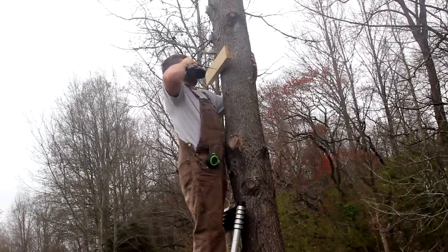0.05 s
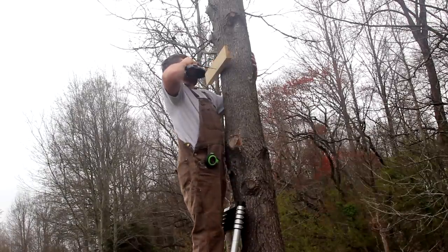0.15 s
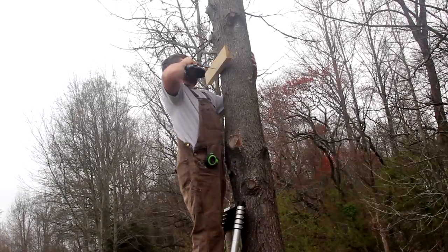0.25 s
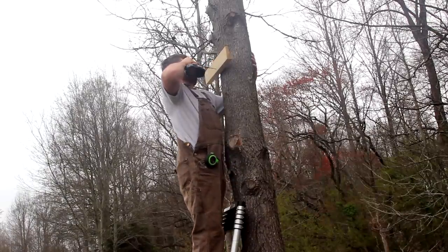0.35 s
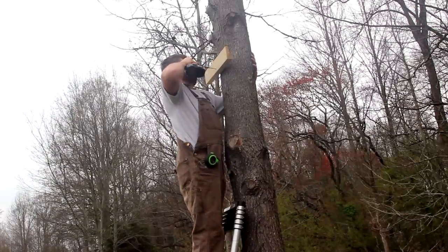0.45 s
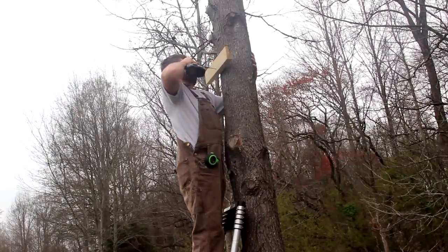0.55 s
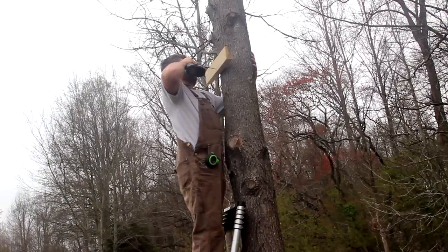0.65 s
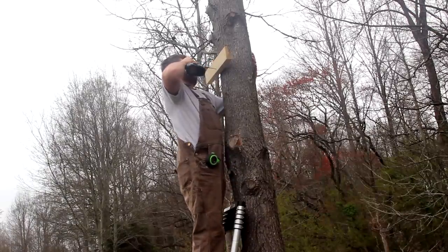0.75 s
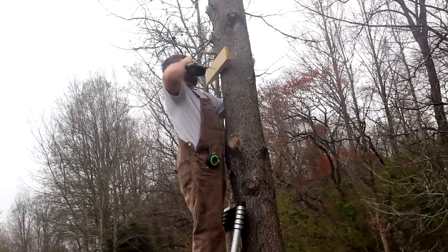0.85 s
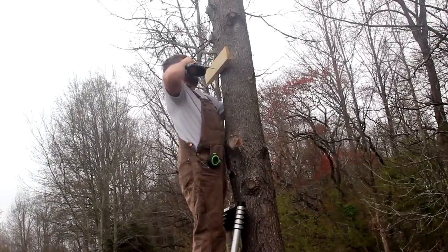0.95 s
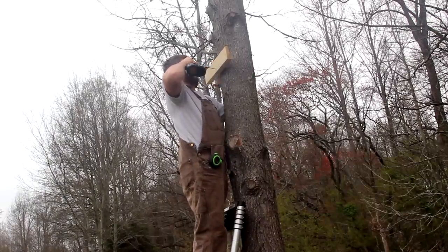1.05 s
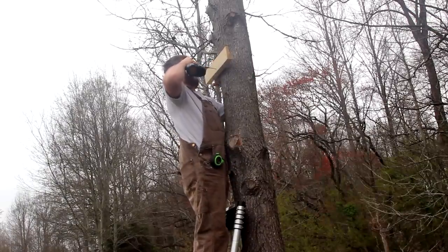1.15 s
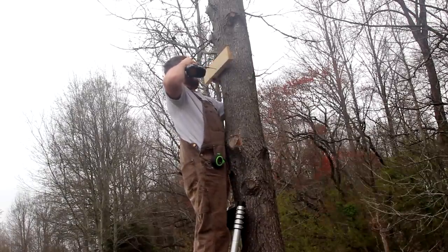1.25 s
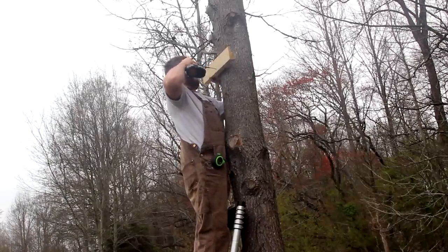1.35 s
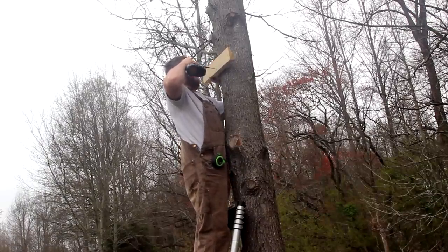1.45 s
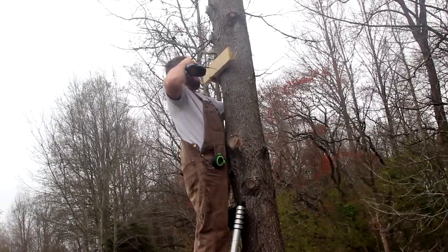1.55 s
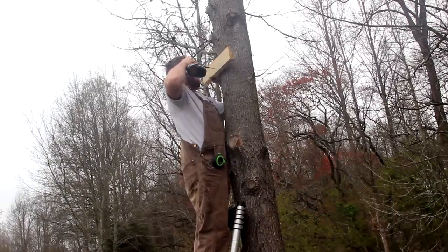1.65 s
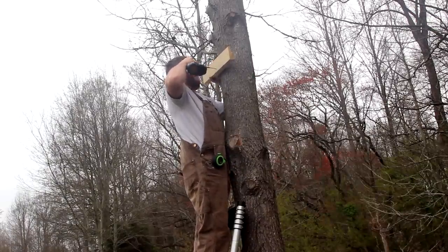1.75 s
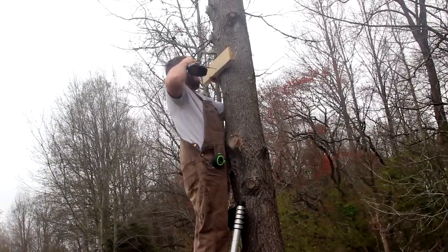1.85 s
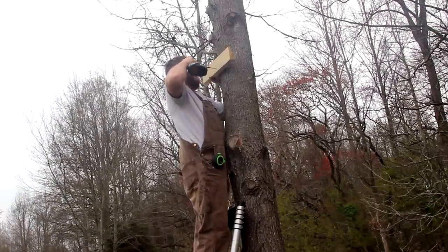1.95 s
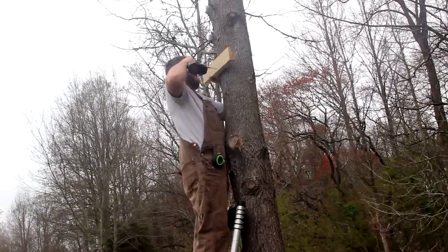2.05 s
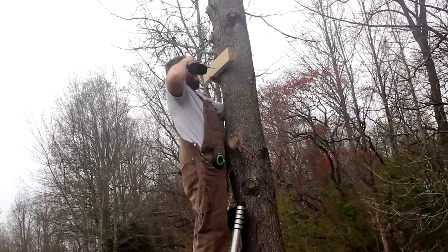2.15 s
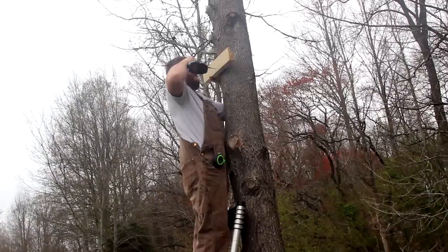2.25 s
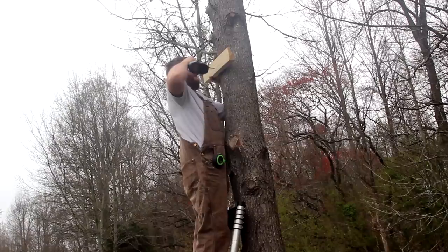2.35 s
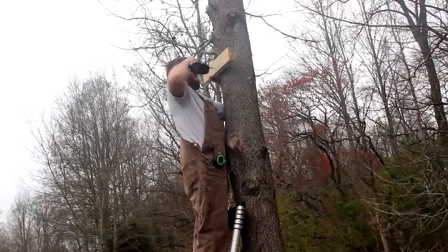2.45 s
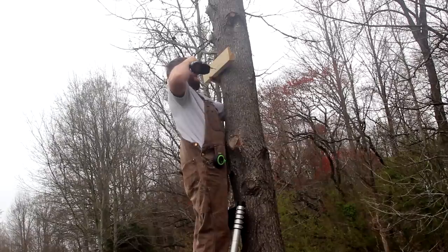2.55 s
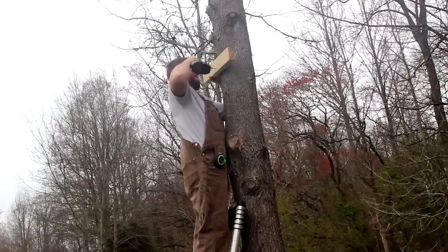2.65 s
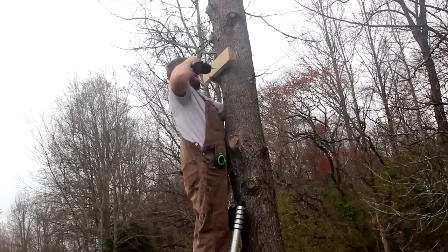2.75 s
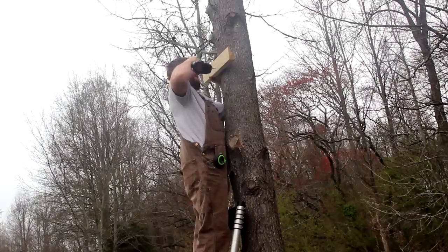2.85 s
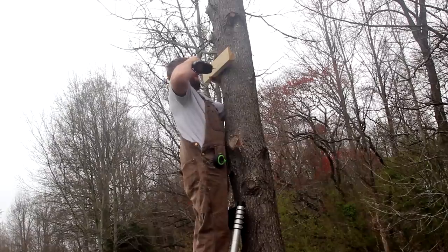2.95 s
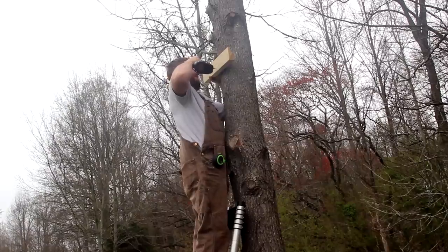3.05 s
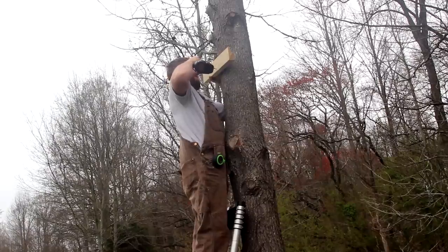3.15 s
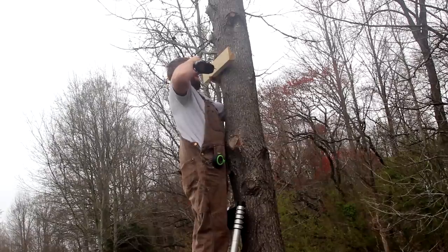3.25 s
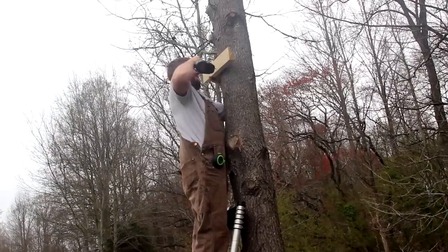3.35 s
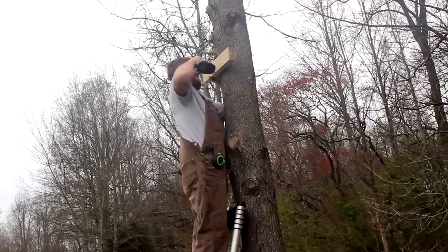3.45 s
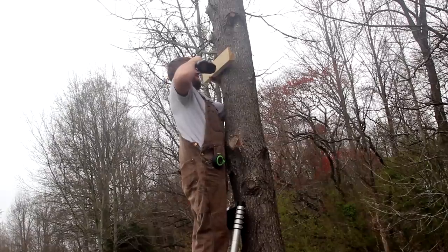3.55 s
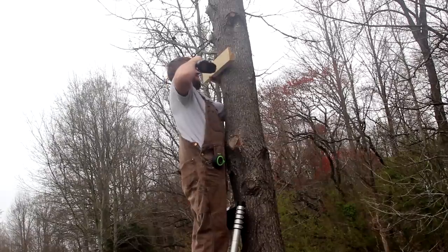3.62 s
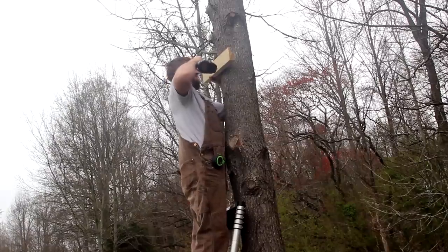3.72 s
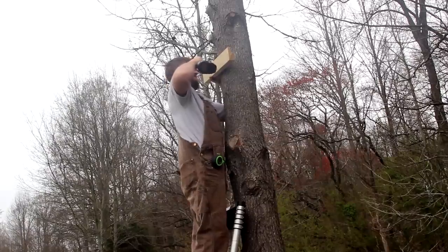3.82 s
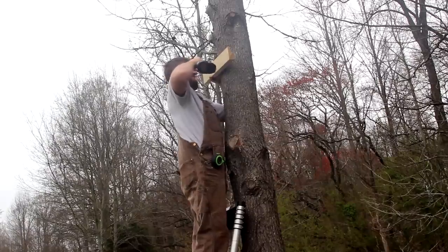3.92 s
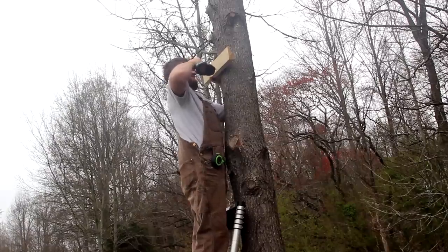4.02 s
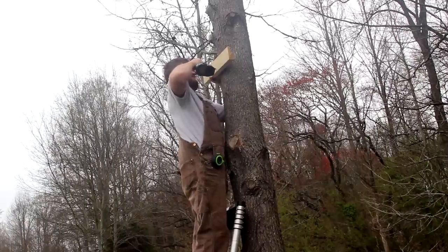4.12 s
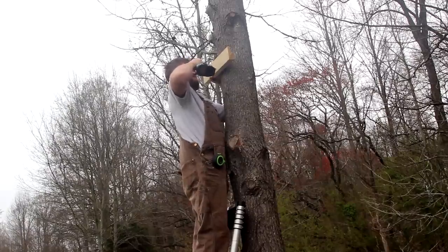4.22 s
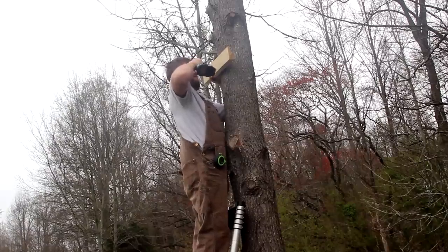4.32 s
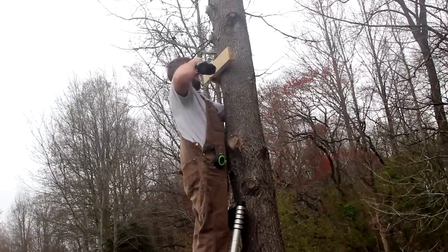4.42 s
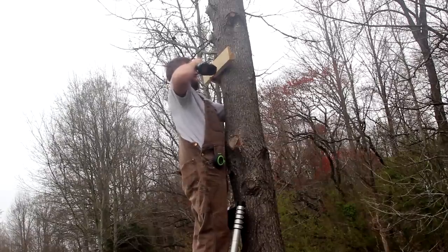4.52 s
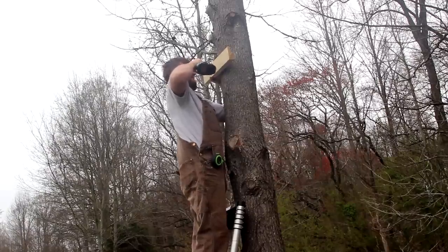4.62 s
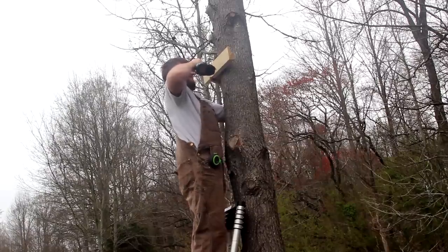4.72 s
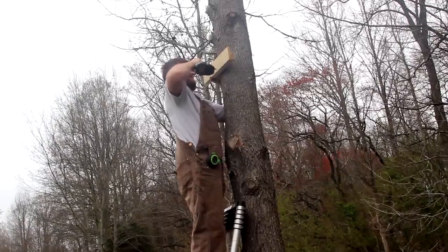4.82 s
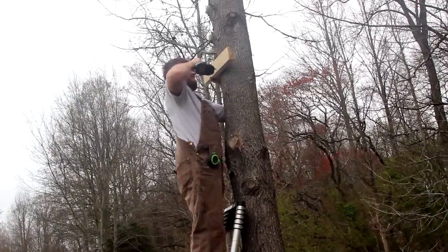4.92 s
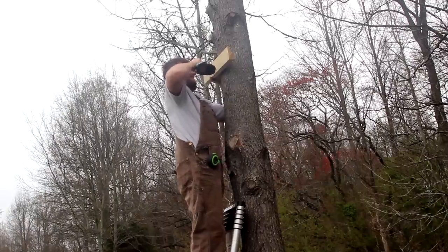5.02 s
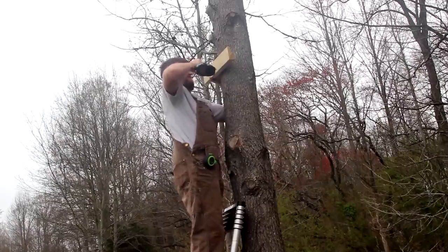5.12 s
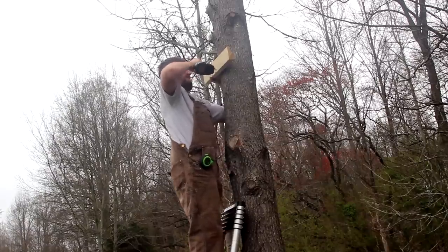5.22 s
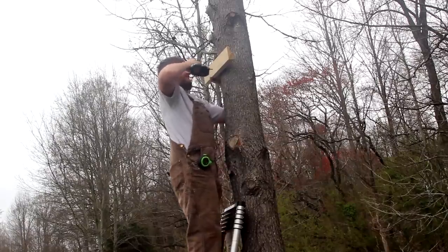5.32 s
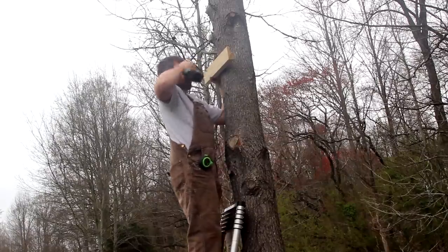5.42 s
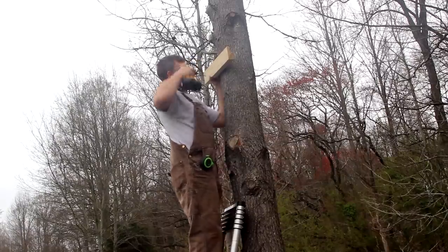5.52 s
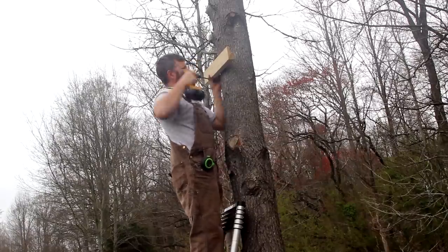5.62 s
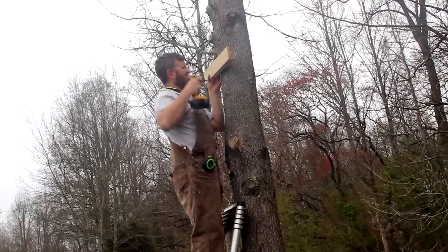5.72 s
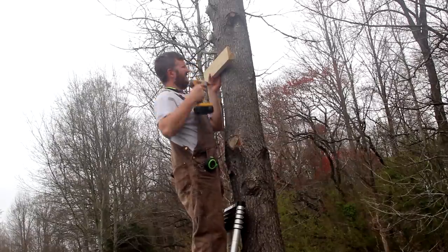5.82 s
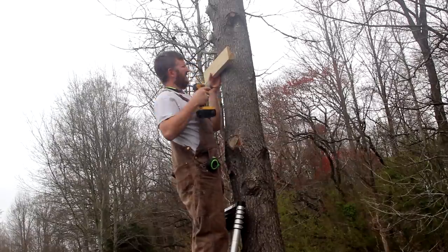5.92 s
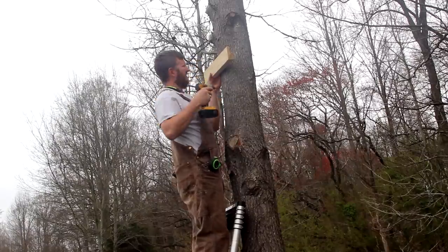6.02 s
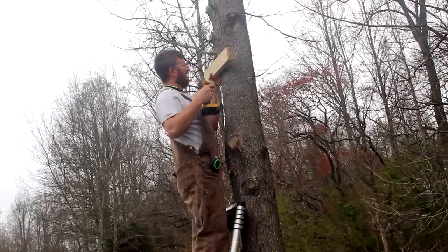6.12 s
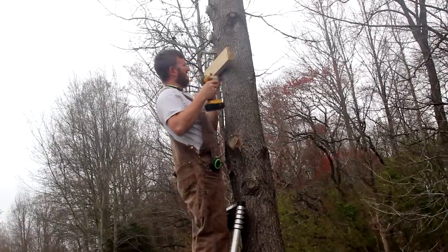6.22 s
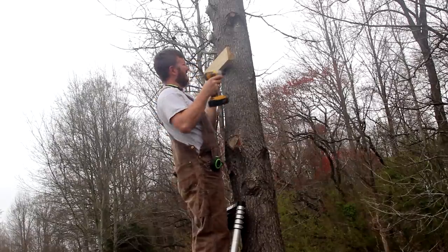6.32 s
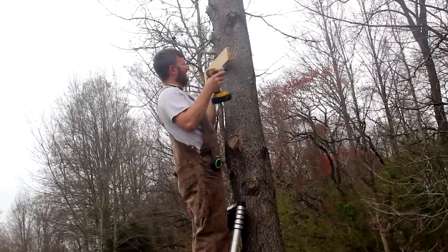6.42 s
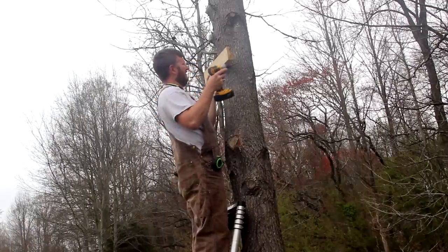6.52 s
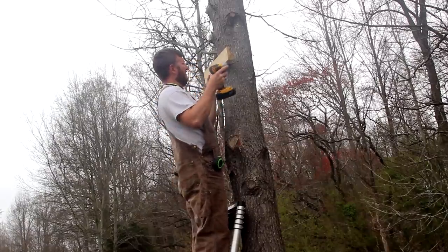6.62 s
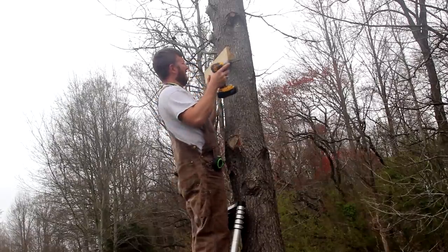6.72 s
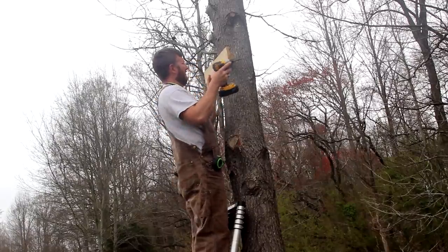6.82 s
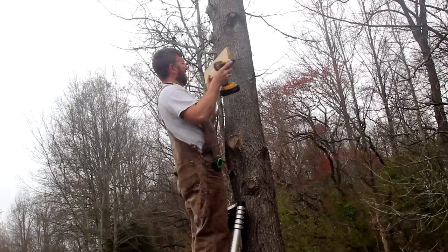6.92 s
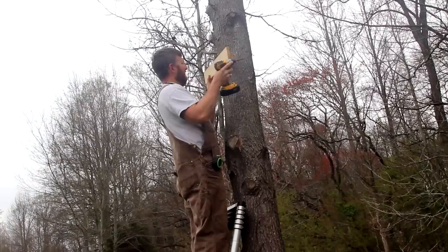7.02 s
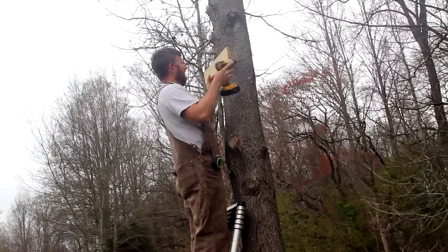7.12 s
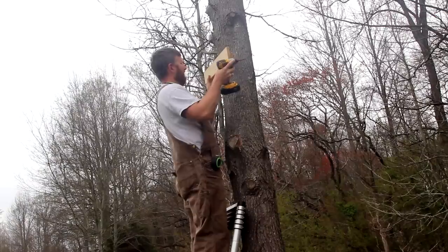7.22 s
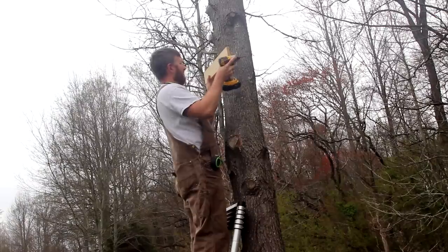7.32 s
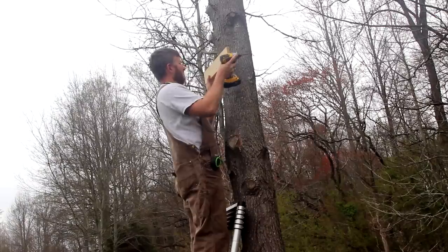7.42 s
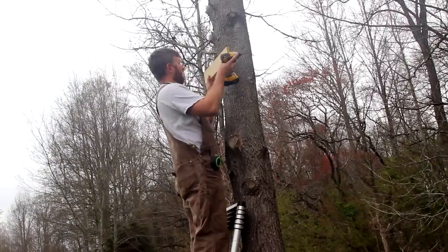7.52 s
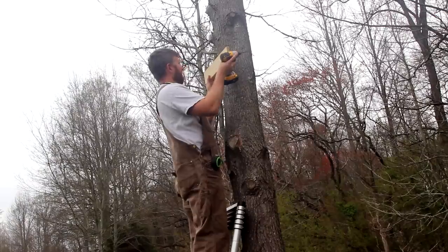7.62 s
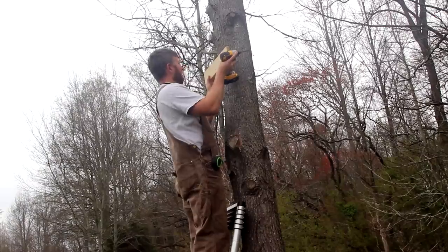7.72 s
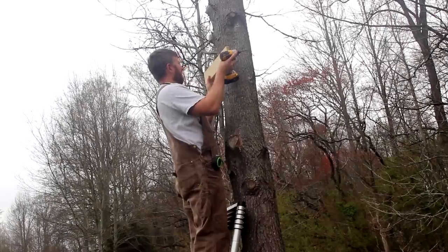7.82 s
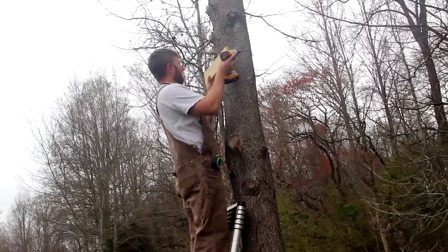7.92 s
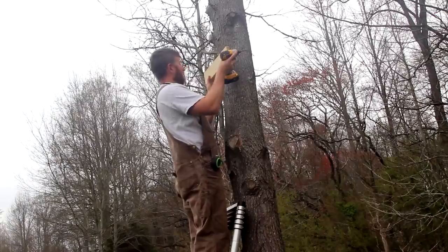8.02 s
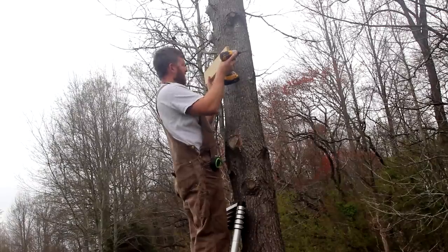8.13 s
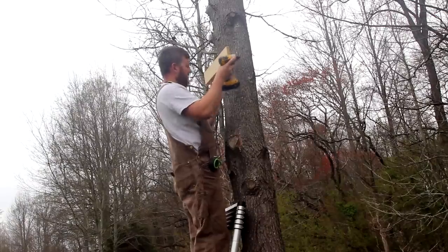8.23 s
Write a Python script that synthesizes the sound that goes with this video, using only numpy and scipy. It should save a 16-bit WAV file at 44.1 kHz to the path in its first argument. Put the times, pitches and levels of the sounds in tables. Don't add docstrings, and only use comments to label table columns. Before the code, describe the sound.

In thin open woods with faint traffic wash, small plastic ticks and a thin metallic squeak come first. An impact driver then fires a short burst, followed by a long, loud drive of rapid cracking, ringing blows on a wooden board. Two more short bursts follow, with trunk echoes. Afterwards, faint bird whistles and soft camera ticks remain. The tool is some metres from the microphone, whose gain dips under the noise.

```python
import sys
import numpy as np
from scipy import signal
from scipy.io import wavfile
from scipy.ndimage import uniform_filter1d

SR = 44100
rng = np.random.default_rng(int(sys.argv[2]) if len(sys.argv) > 2 else 0)


def gain_from_db(level_db):
    decades = np.asarray(level_db, float) / 20
    return 10 ** decades


def dump(signal):
    limited = np.clip(np.atleast_2d(signal).T, -1, 1)
    pcm = np.round(limited * 32767).astype(np.int16)
    wavfile.write(sys.argv[1], SR, pcm)


N = 364707

# [f/Hz, level/dB, t60/s]
LOW_RING = [(1208, 3, 0.051), (1349, -3.5, 0.045), (794, -6.5, .05), (571, -9, 0.034)]
HIGH_RING = [(1893, -3.5, 0.051), (1778, -10, 0.08), (1596, -1.5, 0.02)]
BODY_RING = [(3057, 0.5, 0.016), (3580, -6, 0.023), (4547, -8.5, 0.026), (6320, -13.5, 0.022),
             (8140, -4, 0.0056)]
# [f/Hz, level/dB]
GEAR_HISS = [(150, -56), (500, -10.5), (1500, 7), (4000, 2), (8000, -1.5), (12000, -22.5), (16000, -17)]
# [start/s, hammer engages/s, release/s]
PULLS = [
    (1.72, 1.755, 1.94),
    (2.1, 2.17, 3.915),
    (4.385, 4.45, 4.71),
    (5.015, 5.035, 5.215),
]
COAST_S = .06
PLAIN_DB = -14


def evened(x):
    return x / np.sqrt(np.mean(x ** 2) + 1e-20)


def read(points, hz):
    f, value = np.transpose(points)
    return np.interp(np.log(hz + 1), np.log(f + 1), value)


def curve(points, t):
    return np.interp(t, *np.transpose(points))


def add(mix, s, sound):
    part = mix[round(s * SR):][:len(sound)]
    part += sound[:len(part)]


def sine(hz):
    return np.sqrt(2) * np.sin(2 * np.pi * np.cumsum(hz) / SR)


def colour(x, points):
    half = np.maximum(read(points, np.fft.rfftfreq(4096, 1 / SR)), -100) * np.log(10) / 20
    log_gain = np.concatenate([half, half[-2:0:-1]])
    taps = np.fft.ifft(np.exp(np.conj(signal.hilbert(log_gain)))).real[:2048]
    return signal.oaconvolve(x, taps / np.linalg.norm(taps))[:len(x)]


def resonate(x, hz, width_hz):
    pole = np.exp((2j * np.pi * hz - np.pi * width_hz) / SR)
    return 2 * signal.lfilter([1 - abs(pole)], [1, -pole], x).real


def resonate_twice(x, hz, width_hz):
    return evened(resonate(resonate(x, hz, width_hz), hz, width_hz))


def ring(modes, luck, spread_db=6.0, detune=0.026):
    hz, db, t60_s = np.transpose(modes)[:, :, None]
    t = np.arange(4000) / SR
    size, pitch, phase = luck[:, :len(modes), None] * np.minimum(hz / 1200, 1) ** 2
    swing = gain_from_db(db + spread_db * np.clip(size, -1, 1) - 60 * t / t60_s) * (1 - np.exp(-t / .0006))
    return (swing * np.sin(2 * np.pi * hz * (1 + detune * pitch) * t + 0.66 * phase)).sum(0)


def woods():
    # [f/Hz, level/dB]
    wash_spectrum = [(19, -43), (32, -3), (48, 1), (102, 3.0), (194, -5), (477, 0.0), (1090, -8.0),
                     (1370, -8), (1560, -11.5), (2480, -14.0), (5500, -20),
                     (15000, -30)][:-1] + [(15780, -25.5), (15800, -92)]
    # [f/Hz, width/Hz, level/dB]
    hums = [(104.7, 11.3, -63.5), (251, 12.4, -66.5)]
    # [t/s, level/dB]
    engine_swell = [
        (0, -8),
        (.5, -4.5),
        (1.2, 3.5),
        (5.4, -3.5),
        (5.599, 9),
        (6.6, 1.5),
        (8.27, 3),
    ]
    wash_db, whine_hz, whine_db = -49, 15645.4, -71
    t, hz = np.arange(N) / SR, np.fft.rfftfreq(1024, 1 / SR)
    a, b, patches = rng.standard_normal((N // 256 + 5, 513, 3)).T
    patches = evened(uniform_filter1d(uniform_filter1d(patches, 12, 0), 14, 1))
    z = (a + 1j * b) * gain_from_db(read(wash_spectrum, hz)[:, None] + 1.43 * patches)
    wash = gain_from_db(wash_db - 2.0) * evened(signal.istft(z, nperseg=1024, noverlap=768)[1][:N])
    whine = gain_from_db(whine_db) * np.sqrt(2) * np.sin(2 * np.pi * whine_hz * t)
    noise = rng.standard_normal(N)
    engines = sum(gain_from_db(db) * resonate_twice(noise, f, width_hz) for f, width_hz, db in hums)
    return wash + whine + gain_from_db(curve(engine_swell, t)) * engines


def focus_creep():
    low, high = rng.standard_normal((N, 2)).T * (rng.random(N) < 150 / SR)
    return gain_from_db(-66) * evened(resonate(low, 1340, 70)) + gain_from_db(-67) * evened(resonate(high, 2480, 150))


def focus_ticks():
    # [t/s, peak level/dB]
    tick_events = [(0.2475, -38), (0.376, -46), (0.4983, -41), (0.612, -40), (0.7482, -49), (0.816, -46),
                   (0.8844, -40), (1.005, -46), (1.484, -40), (1.517, -42), (1.6057, -38), (1.6422, -36),
                   (1.6866, -35.5), (1.7265, -40), (5.6173, -38.5), (6.1671, -39), (6.3636, -49),
                   (6.3841, -40.5), (6.5132, -38), (6.637, -38), (6.6845, -38.5), (6.7592, -38),
                   (7.0885, -45), (7.103, -40), (7.1509, -40), (7.1838, -38.5), (7.6911, -38.5),
                   (7.887, -44), (8.0573, -52), (8.1201, -40)]
    # [f/Hz, level/dB, t60/s]
    case_ring = [(1974, 2, 0.028), (2170, -0.5, 0.022), (2470, -3, 0.042), (1370, -5.5, 0.051)]
    second_tick_db = -9
    out = np.zeros(N)
    for (s, db), luck in zip(tick_events, rng.standard_normal((len(tick_events), 3, 4))):
        add(out, s, gain_from_db(db - 2.5) * ring(case_ring, luck, spread_db=1.5))
        if s < 1:
            second_s = s + 0.012 + .004 * luck[0, 0]
            second_amp = gain_from_db(db + second_tick_db + 2 * luck[1, 0])
            add(out, second_s, second_amp * ring(case_ring, luck[::-1]))
    return out


def squeaks():
    # [t/s, pitch/Hz, level/dB]
    squeak_tracks = [
        [(.316, 4900, -60), (.348, 6200, -54), (.365, 5720, -52), (.39, 6000, -55), (.415, 5720, -50),
         (.445, 5920, -49), (.71, 5985, -55), (.752, 5720, -54)],
        [(.755, 6000, -64), (.78, 6150, -59), (.81, 6150, -58), (.82, 5500, -60)],
        [(1.485, 4900, -62), (1.5, 5300, -58), (1.52, 4900, -60)],
        [(1.53, 3900, -60), (1.55, 4800, -56), (1.575, 5330, -53), (1.598, 4900, -57), (1.625, 3700, -62)],
    ]
    out = np.zeros(N)
    for rows in squeak_tracks:
        s, hz_points, db_points = np.transpose(rows)
        t = np.arange(s[0], s[-1], 1 / SR)
        glide_hz = uniform_filter1d(np.interp(t, s, hz_points), 500, mode="nearest")
        waver = evened(uniform_filter1d(rng.standard_normal(len(t)), 150))
        turn = 2 * np.pi * np.cumsum(glide_hz + (25 + 40 * (t > 1)) * waver) / SR
        tone = np.sin(turn) + gain_from_db(glide_hz / 100 - 63 - 15 * (t < 1)) * np.sin(2 * turn)
        fade = signal.windows.tukey(len(t), 0.0067 / (t[-1] - t[0]))
        add(out, t[0], np.sqrt(2) * gain_from_db(np.interp(t, s, db_points)) * tone * fade)
    return out


def bit_clicks():
    # [t/s, peak level/dB]
    click_events = [
        (0.3227, -38.5),
        (0.376, -29.5),
        (1.474, -38),
        (1.4867, -38),
        (1.5208, -35.5),
        (1.531, -34),
        (1.619, -35),
        (1.6616, -32),
        (6.439, -46),
    ]
    out, t = np.zeros(N), np.arange(1500) / SR
    for s, db in click_events:
        hiss = colour(rng.standard_normal(len(t)), GEAR_HISS)
        add(out, s, gain_from_db(db - 7 - 60 * t / 0.039) * hiss)
    return out


def bit_scrapes():
    # [t/s, length/s, level/dB, f/Hz]
    scrape_events = [
        (0.811, 0.076, -50, 7460),
        (1.468, 0.37, -54.5, 1990),
        (8.227, .03, -56, 7500),
    ]
    out = np.zeros(N)
    for s, length_s, db, hz in scrape_events:
        grit = rng.standard_normal(round(length_s * SR)) ** 3
        add(out, s, gain_from_db(db) * evened(resonate(grit, hz, .6 * hz)) * np.hanning(len(grit)))
    return out


def rattle_level():
    pull_db = [-31, -28.5, -31, -32]
    idle_db, surge_db, surge_s = -11, 5, .04
    load_db_per_s, brake_db_per_s = -1.5, -400
    level = np.zeros(N)
    for (start, engage, stop), db in zip(PULLS, pull_db):
        t = np.arange(start, stop + COAST_S, 1 / SR)
        shape_db = db + load_db_per_s * (t - start)
        shape_db += idle_db * np.clip((engage - t) / 0.017, 0, 1)
        shape_db += surge_db * np.exp(-((t - engage - .03) / surge_s) ** 2)
        shape_db += brake_db_per_s * np.maximum(t - stop, 0)
        add(level, start, gain_from_db(shape_db) * np.minimum((t - start) / 0.0052, 1))
    return level


def gears():
    # [f/Hz, width/Hz, level/dB]
    mesh_modes = [(4560, 520, -11), (8600, 800, -18)]
    # [t/s, level/dB]
    mesh_fade = [
        (2.2, -15.5),
        (2.5, 0),
        (2.8, -13),
        (3.1, -17),
    ]
    knocks = rng.standard_normal(N) * gain_from_db(2.2 * np.minimum(rng.exponential(1, N), 4))
    knocks *= rng.random(N) < 9000 / SR
    shaken = sum(gain_from_db(db) * evened(resonate(knocks, hz, 4 / t60_s))
                 for hz, db, t60_s in [*LOW_RING, *HIGH_RING, *BODY_RING])
    mesh = sum(gain_from_db(db) * resonate_twice(knocks, hz, width_hz) for hz, width_hz, db in mesh_modes)
    mesh = gain_from_db(curve(mesh_fade, np.arange(N) / SR)) * mesh
    hiss = evened(colour(knocks, GEAR_HISS))
    return rattle_level() * (mesh + gain_from_db(-7.5) * evened(shaken) + gain_from_db(-12.0) * hiss)


def blows():
    # [t/s, blows so far]
    beat = [
        (2.1849, 0),
        (2.3987, 7),
        (2.7036, 17),
        (2.973, 26),
        (3.2429, 35),
        (3.4938, 44),
        (3.6269, 49),
        (3.7321, 53),
        (3.857, 58),
        (3.9112, 60),
    ]
    # [t/s, crack level/dB, extra board ring/dB]
    hard_blows = [(2.1846, -6.5, 8.5), (2.216, -8.5, 2), (2.2462, -10.5, 6.5), (2.276, -9.5, 2.5),
                  (2.399, -13, 3), (2.46, -9.5, 3), (2.4897, -12.5, 8.5), (2.5202, -10, 3),
                  (2.5512, -10, 4), (2.5811, -6.5, 3), (2.6121, -10.5, 6.5), (2.7631, -9, 2),
                  (2.854, -14, 6), (2.9428, -7.5, 0), (3.1237, -13, 0), (3.153, -9.5, -1),
                  (3.1834, -9.5, 4), (3.2989, -10, 4.5), (3.3543, -12, 4), (3.4091, -9, 3),
                  (3.4937, -11, 0), (3.521, -10.5, 0), (3.5474, -12, -16), (3.6542, -12.5, -10),
                  (3.6805, -13.5, 2), (3.7061, -10, -2), (3.7319, -12, -1), (3.783, -11, 5),
                  (3.8327, -10, -0.5), (3.8828, -10.5, 2)]
    # [t/s, crack level/dB, extra board ring/dB]
    burst_blows = [(1.7486, -23.5, 2), (1.7948, -3.5, 5), (1.8251, -6, -4), (1.8558, -12, -1),
                   (1.8872, -11, -4), (1.9239, -14.5, -9), (1.9469, -18, 8), (4.4786, -2.5, 0),
                   (4.5156, -10.5, 1), (4.543, -9.5, 1), (4.5708, -11.5, -2.5), (4.5963, -11.5, 1),
                   (4.6234, -12, 1), (4.6489, -16.5, 3), (4.6751, -13.5, -5), (4.7039, -17, -3),
                   (5.0387, -4.5, -3), (5.0715, -6.5, -0.5), (5.0973, -6.5, -10), (5.1227, -11, -17),
                   (5.147, -20, -9), (5.1707, -11, 2), (5.2, -13.5, -5)]
    plain_spread_db = -0.4
    s, number = np.transpose(beat)
    plain_s = np.interp(np.arange(number[-1] + 1), number, s)
    plain_db = PLAIN_DB + plain_spread_db * rng.standard_normal(len(plain_s))
    drive = np.transpose([plain_s, plain_db, 0 * plain_s])
    for row in hard_blows:
        drive[np.argmin(abs(plain_s - row[0]))] = row
    return np.array(sorted(map(tuple, [*burst_blows, *drive]))).T


def blow_rings(s, db, extra_db):
    free_db = [-29.5, -24.5, -29]
    tight_db = [-5, -2.5, 6.5]
    fresh_db = [4.5, -3.5, 9]
    board_share = [0.52, 1, 0]
    slack_gap_s, tight_gap_s, settle_s = 0.032, 0.026, 0.057
    ring_follows, ring_spread_db = 0.85, 2
    gap_s = np.minimum(np.diff(s, prepend=0), np.diff(s, append=9))
    tight = np.clip((slack_gap_s - gap_s) / (slack_gap_s - tight_gap_s), 0, 1)
    fresh = sum(np.exp(-abs(s - engage) / settle_s) * (s > start) * (s < stop + COAST_S)
                for start, engage, stop in PULLS)
    ring_db = free_db + np.outer(tight, tight_db) + np.outer(fresh, fresh_db)
    ring_db = ring_db + ring_follows * (db - PLAIN_DB)[:, None] + np.outer(extra_db, board_share)
    ring_db = ring_db + ring_spread_db * rng.uniform(-1.2, 1.2, ring_db.shape)
    return ring_db - db[:, None]


def light_strikes(s):
    # [t/s, level/dB]
    slips = [(1.7776, -14), (1.787, -12), (1.813, -14.5), (1.8354, -13), (1.8732, -17), (1.8831, -9),
             (1.8971, -18), (1.9128, -15), (1.9345, -21), (1.963, -19), (1.9692, -22), (2.1187, -33),
             (2.139, -28), (2.152, -30), (2.1626, -15.5), (2.1752, -12.5), (2.1994, -25), (2.2077, -21),
             (3.1008, -18), (3.9251, -24.5), (4.4057, -30.5), (4.4502, -22), (4.4719, -15.5),
             (4.4944, -30.5), (4.9909, -28), (5.0294, -14), (5.0333, -13.5), (5.049, -22.5), (5.061, -6),
             (5.2142, -20.5)]
    # [from/s, to/s, lag/s, level/dB]
    bounces = [
        (2.3, 2.95, .009, -29.5),
        (2.3, 2.95, .02, -25),
        (4.5, 4.71, -.0068, -15.5),
        (5.06, 5.21, -0.01, -28),
    ]
    rebound_db = [-1, 1, 4]
    seated_db = [-7, -3, -2]
    seated_s, bounce_spread_db, bounce_jitter_s = 3, 1, .001
    light = list(slips)
    for t0, t1, lag_s, bounce_db in bounces:
        when, size = rng.standard_normal((2, len(s)))
        rows = np.transpose([s + lag_s + bounce_jitter_s * when, bounce_db + bounce_spread_db * size])
        light += list(rows[(s > t0) & (s < t1)])
    return [(at, db - 9.5, *np.add(rebound_db, (at > seated_s) * np.array(seated_db))) for at, db in light]


def hammer(s, db, extra_db):
    # [f/Hz, level/dB]
    crack_spectrum = [(300, -44), (700, -29), (1200, -7), (1900, 1.5), (2300, -8), (3000, -4.5), (4500, -4),
                      (8500, -7), (12000, -11.5), (16500, -16.5)]
    rows = list(np.c_[s, db, blow_rings(s, db, extra_db)]) + light_strikes(s)
    cracks, rings, t = np.zeros(N), np.zeros(N), np.arange(4000) / SR
    burst = (gain_from_db(-60 * t / 0.0081) + gain_from_db(-15.5 - 60 * t / 0.045)) * (1 - np.exp(-t / 0.00044))
    for at, crack_db, *ring_db in rows:
        add(cracks, at - .0004, gain_from_db(crack_db + 3.0) * burst * rng.standard_normal(len(t)))
        for modes, rel_db, luck in zip((LOW_RING, HIGH_RING, BODY_RING), ring_db, rng.standard_normal((3, 3, 5))):
            add(rings, at - .0004, gain_from_db(crack_db + rel_db + 3.5) * ring(modes, luck))
    late = round(0.0048 * SR)
    return colour(cracks, crack_spectrum), rings + 0.25 * np.pad(rings, (late, 0))[:N]


def trunk(times):
    # [t/s, f/Hz]
    push_hz = [
        (1.75, 144),
        (2.3, 141),
        (3.5, 250),
        (3.9, 237),
        (4.45, 210),
    ]
    # [t/s, level/dB]
    shoves = [(1.785, -25), (1.831, -46), (1.921, -30), (2.179, -30.5), (2.218, -34.5), (3.915, -36.5),
              (4.475, -26), (4.699, -36.5), (5.036, -22), (5.07, -57), (5.199, -41.5)]
    out, t = np.zeros(N), np.arange(3000) / SR
    for s in times:
        turn = 2 * np.pi * curve(push_hz, s) * t
        push = .6 * np.sin(turn) + np.sin(1.5 * turn) + .8 * np.sin(2.1 * turn) + .6 * np.sin(2.8 * turn)
        add(out, s, gain_from_db(-38.5 - 60 * t / .055) * push * (1 - np.exp(-t / .002)))
    for s, db in shoves:
        puff = evened(resonate(rng.standard_normal(len(t)), 520, 500))
        add(out, s, gain_from_db(db - 60 * t / 0.14) * (1 - np.exp(-t / 0.00091)) * puff)
    return out


def tree_echoes(x):
    # [f/Hz, t60/s]
    decay = [(300, 1), (2500, 0.53), (10000, 0.39)]
    taps = np.zeros(SR)
    at = np.arange(900, SR - 20, 20)
    taps[at + rng.integers(0, 20, len(at))] = rng.choice([-1., 1.], len(at))
    hz, t, z = signal.stft(taps, SR, nperseg=256)
    near = gain_from_db(-60 * t / read(decay, hz)[:, None])
    far = gain_from_db(-16 - 7.3 * t - 9.3 * abs(np.log2(hz[:, None] / 2600 + 0.0087)))
    tail = signal.istft(z * (near + far), SR, nperseg=256)[1]
    return signal.fftconvolve(x, tail / np.linalg.norm(tail))[:N]


def ducking():
    pull_duck_db = [-6, -11, -10.5, -10.5]
    fall_s, hold_s, rise_s, ease_db_per_s = 0.071, 0.34, 0.046, 25
    t, duck_db = np.arange(N) / SR, np.zeros(N)
    for (_, engage, stop), db in zip(PULLS, pull_duck_db):
        depth = np.clip(np.minimum((t - engage) / fall_s, (stop + hold_s - t) / rise_s), 0, 1)
        duck_db = np.minimum(duck_db, depth * (db + ease_db_per_s * np.maximum(t - stop, 0)))
    return gain_from_db(duck_db)


def birds():
    # [t/s, length/s, first pitch/Hz, held pitch/Hz, peak level/dB]
    whistles = [
        (4.39, .07, 3720, 3750, -54),
        (4.76, .25, 3000, 2990, -62),
        (5.38, .37, 4420, 4240, -59),
        (5.8, .25, 1700, 1690, -60),
        (6.53, .17, 7200, 6750, -61),
        (6.625, .09, 6100, 5720, -64),
        (6.69, .29, 6230, 6320, -57),
        (7.05, .5, 3060, 2995, -54),
        (7.1, .075, 3500, 5000, -61),
        (7.165, .045, 4950, 3500, -62),
    ]
    # [t/s, peak level/dB]
    chips = [
        (4.165, -56),
        (4.835, -58),
        (5.535, -57),
        (6.635, -63),
        (7.32, -62),
    ]
    blur_hz, blur_power, glide_blur = 40, 4, .1
    # glide and rise as shares of the length, end level/dB
    notes = [(*row, .4, .35, -15) for row in whistles]
    notes += [(s, .2, 3000, 3760, db, .04, .1, -30) for s, db in chips]
    out = np.zeros(N)
    for s, length_s, first_hz, held_hz, db, glide, rise, end_db in notes:
        part = np.arange(0, length_s, 1 / SR) / length_s
        hz = held_hz + (first_hz - held_hz) * np.exp(-part / glide)
        swell_db = np.interp(part, [0, rise, 1], [-6, 0, end_db])
        wobble, flutter = uniform_filter1d(rng.standard_normal((len(part), 2)), 300, axis=0).T
        blur = (blur_hz + glide_blur * abs(first_hz - held_hz)) * (hz / 6000) ** blur_power
        tone = sine(hz + blur * evened(wobble)) * signal.windows.tukey(len(part), .1)
        add(out, s, gain_from_db(db + swell_db + 3.4 * evened(flutter)) * tone)
    return out


def scene():
    s, db, extra_db = blows()
    cracks, rings = hammer(s, db, extra_db)
    rest = gears() + squeaks() + trunk(s)
    echoes = gain_from_db(-22) * tree_echoes(cracks + .4 * rings + rest)
    no_bass = signal.butter(4, 125, "high", fs=SR, output="sos")
    tool = signal.sosfilt(no_bass, cracks + rings + rest + echoes)
    background = ducking() * (woods() + focus_creep())
    small_knocks = focus_ticks() + bit_clicks() + bit_scrapes()
    return (tool + background + birds() + small_knocks)[None]


def top_cut(x):
    return signal.sosfilt(signal.butter(12, 17130, fs=SR, output="sos"), x)


def record(dry):
    low_pass = signal.firwin(255, 15950, window=("kaiser", 5), fs=SR)
    limited = signal.oaconvolve(dry, low_pass[None], "same")
    return top_cut(0.98 * np.tanh(limited / 0.98) + .0007)


dry = scene()
out = record(dry)
dump(out)
```